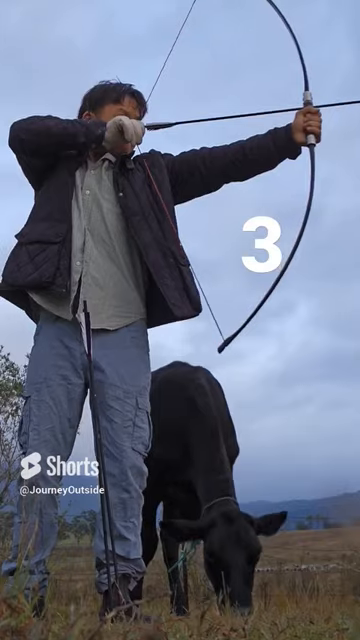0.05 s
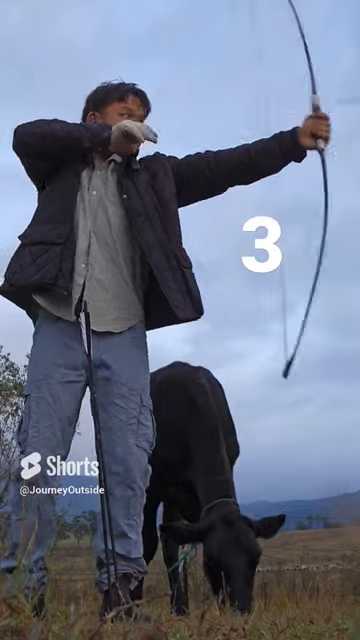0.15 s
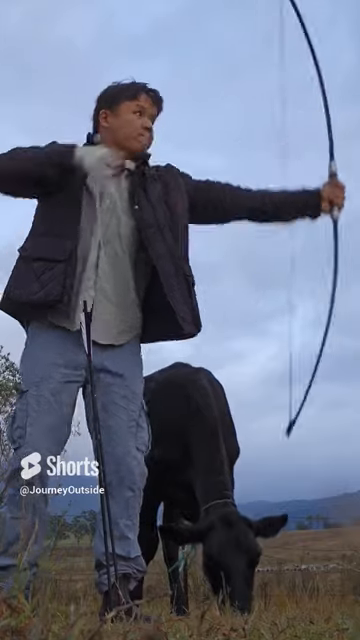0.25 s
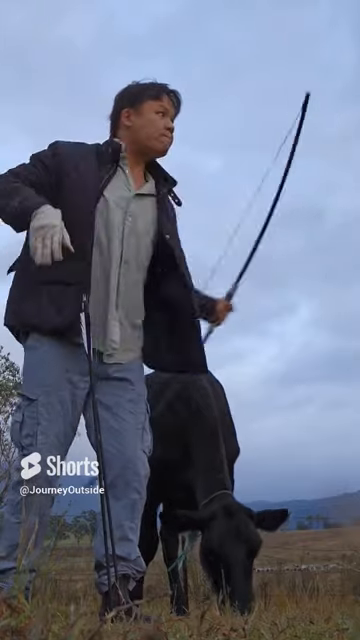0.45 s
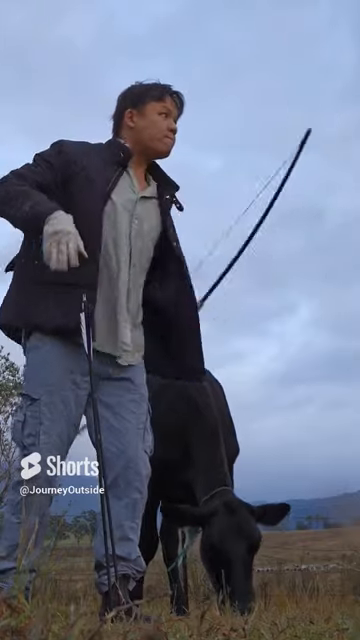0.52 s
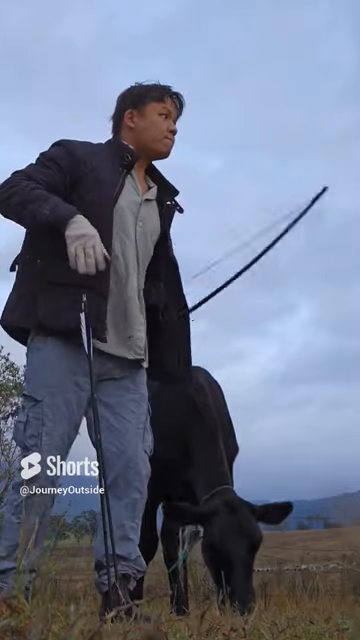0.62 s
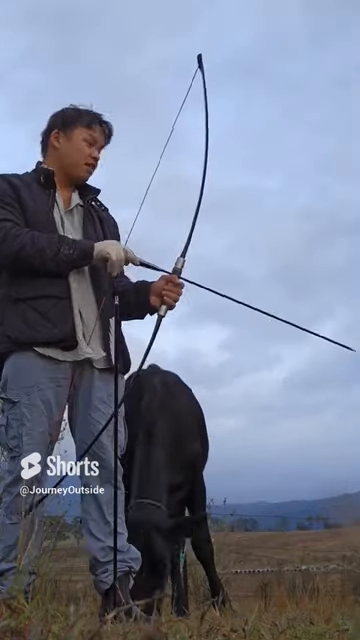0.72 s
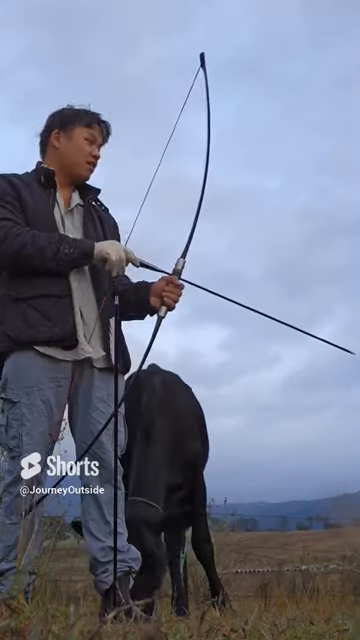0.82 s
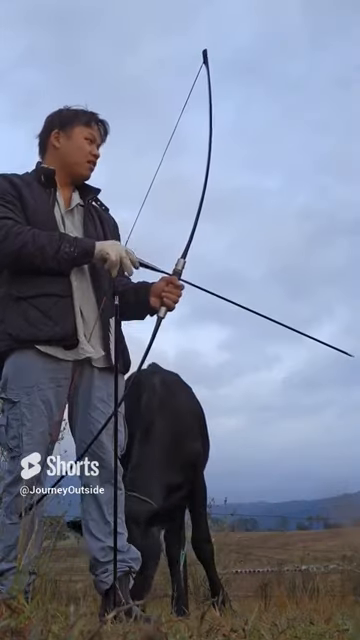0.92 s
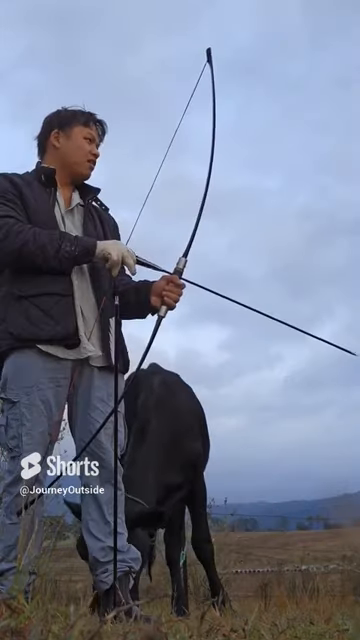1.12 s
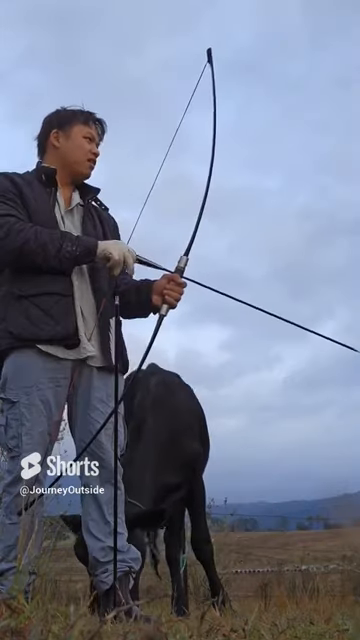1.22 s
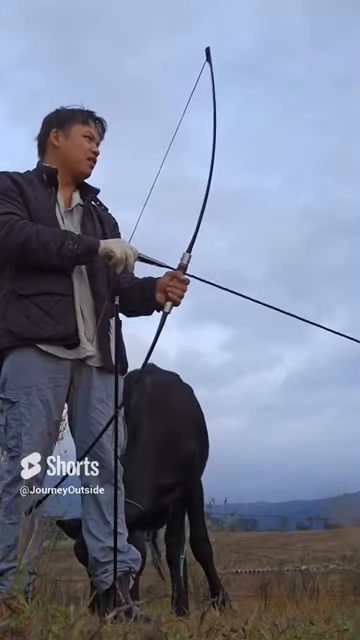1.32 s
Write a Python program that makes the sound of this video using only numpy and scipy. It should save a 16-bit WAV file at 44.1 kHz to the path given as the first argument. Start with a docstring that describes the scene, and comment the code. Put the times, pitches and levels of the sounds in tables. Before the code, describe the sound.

A bowstring snaps sharply close by at about 0.2 seconds. The arrow scrapes and rattles past the bow and swishes off slightly left, while the bow thumps and the string hums low, fading by 0.7 seconds. After a brief near-silence, soft knocks of arrow handling come from 0.8 to 1 second. Faint air and insects fill the open field, with a distant bird whistling twice around 1.2 seconds.

```python
"""A bowstring slips off an archer's glove and snaps home, close by in an open field. The arrow scrapes
past the bow, rings and swishes away, the limbs thump and ring in their damped modes, and the string
hums and buzzes out in free vibration. After a brief near-silence the next arrow is handled with soft
knocks. Low air, insects and a far bird lie behind."""
import sys
import numpy as np
from scipy import signal
from scipy.fft import rfft, irfft, next_fast_len
from scipy.io import wavfile
from scipy.ndimage import map_coordinates

SR = 44100
rng = np.random.default_rng(int(sys.argv[2]) if len(sys.argv) > 2 else 0)


def inscribe(sig):
    """Save sig as 16-bit PCM at rate SR to the path in sys.argv[1].

    A 1-D sig is mono; a 2-D sig holds one channel per row.
    Samples are clipped to [-1, 1] before scaling.
    """
    pcm = np.round(np.clip(np.atleast_2d(sig).T, -1, 1) * 32767)
    wavfile.write(sys.argv[1], SR, pcm.astype(np.int16))


N = 59535

# spectrum of a bright click: f/Hz, relative level/dB
CLICK_SPECTRUM = [(500, -25), (2500, -10), (4400, 2), (7000, -6), (8500, -2), (10500, -8), (13000, -2),
                  (16000, -4)]
# left-right coherence of the open field: f/Hz, correlation
FIELD_COHERENCE = [(60, .75), (130, .7), (300, .55), (650, .35), (1500, .3), (3500, .15), (7000, 0)]
# left-right coherence of sounds at the bow: f/Hz, correlation
BOW_COHERENCE = [(200, .99), (650, .95), (1400, .75), (2000, .3), (2600, -.1), (4500, -.3), (7000, -.1),
                 (14000, 0)]


def amp(db):
    """Amplitude ratio of a level in decibels."""
    return 10 ** (np.asarray(db) / 20)


def unit_rms(x):
    """Normalisation to unit mean power."""
    return x / np.sqrt(np.mean(x ** 2) + 1e-20)


def since(start):
    """Time/s elapsed since start, zero before it."""
    return np.maximum(np.arange(N) / SR - start, 0)


def along(points, hz):
    """Interpolation of (f/Hz, value) points on a logarithmic frequency axis."""
    f, values = np.transpose(points)
    return np.interp(np.log(hz + 1), np.log(f + 1), values)


def filtered(x, response):
    """Linear filtering: the spectrum of x is multiplied by a frequency response."""
    size = next_fast_len(N + 4096, True)
    return irfft(rfft(x, size) * response(np.fft.rfftfreq(size, 1 / SR)), size)[..., :N]


def wobble(rate):
    """Random offset: a smooth curve through Gaussian knots, crossing only rate/SR knots a second, so nearly
    constant."""
    return map_coordinates(rng.standard_normal(N // 8), [since(0) * rate / SR])


def pan(left_db):
    """Level difference between the channels, left over right, as two gains."""
    return amp(np.array([[left_db], [-left_db]]) / 2)


def noise(spectrum, coherence):
    """Coloured stereo noise of unit rms; the ratio of mid to side sets its coherence."""
    def response(hz):
        angle = np.arccos(np.clip(along(coherence, hz), -1, 1)) / 2
        return amp(along(spectrum, hz)) * [np.cos(angle), np.sin(angle)]
    mid, side = filtered(rng.standard_normal((2, N)), response)
    return unit_rms(np.array([mid + side, mid - side]))


def envelope(start, attack, hold, t60, db):
    """Exponential decay, 60 dB in t60, after a smooth rise and a hold (all times in s)."""
    rise = np.sin(np.pi / 2 * np.minimum(since(start) / (attack + 1e-6), 1)) ** 2
    return amp(db) * rise * np.exp(-np.log(1000) * since(start + attack + hold) / t60)


def ring(modes, start, attack, jitter_rad):
    """Superposition of damped modes struck together, each with a small random phase offset."""
    return sum(envelope(start, attack, 0, t60, db)
               * np.sin(2 * np.pi * hz * since(start) + jitter_rad * wobble(90))
               for hz, db, t60 in modes)


def air():
    """Moving air gives broadband noise, strongest at low frequencies and drifting in level."""
    # spectrum of the air: f/Hz, relative level/dB
    spectrum = [(20, -20), (40, -5), (85, 0), (170, -3), (250, -4), (350, -12), (700, -15.5), (1000, -23),
                (1500, -26), (1900, -32), (2700, -35), (4400, -35), (6000, -41), (10000, -45), (11500, -40),
                (15500, -42)]
    # slow drift: t/s, level/dB
    drift = [(0, -67), (.17, -65.5), (.58, -68.5), (.72, -66.5), (.85, -68), (1.35, -69.3)]
    level_db = np.interp(since(0), *np.transpose(drift)) + 1.2 * wobble(25)
    return amp(level_db) * noise(spectrum, FIELD_COHERENCE) * pan(left_db=1.3)


def insects():
    """An insect chorus is narrow-band noise at a nearly steady level."""
    # band of the chorus: f/Hz, relative level/dB
    spectrum = [(2600, -50), (3200, -22), (3450, -6), (3680, 0), (3830, -4), (4020, -21), (4600, -50)]
    level_db = -79 + 1.3 * wobble(60)
    return amp(level_db) * noise(spectrum, FIELD_COHERENCE) * pan(left_db=.4)


def bird():
    """A far bird whistles two nearly pure tones."""
    # whistles: t/s, duration/s, f/Hz, level/dB
    notes = [(1.152, .088, 1211, -78), (1.25, .12, 1604, -87)]
    return sum(envelope(start, attack=.015, hold=length - .02, t60=.08, db=db)
               * np.sin(2 * np.pi * hz * since(start) + .2 * wobble(40))
               for start, length, hz, db in notes)


def wash():
    """Reverberation: an airy wash from the field decays exponentially after the snap."""
    return envelope(.27, attack=.04, hold=0, t60=.75, db=-79) * noise(CLICK_SPECTRUM, FIELD_COHERENCE)


def scatter(x, t60, db):
    """Diffuse scattering by grass and ground: convolution with a short tail of decaying noise."""
    decay = envelope(.004, attack=.004, hold=0, t60=t60, db=0)[:SR // 2]
    tail = rng.standard_normal((2, SR // 2)) * decay
    return amp(db) * signal.fftconvolve(x, tail / np.linalg.norm(tail[0]), axes=1)[:, :N]


def ticks():
    """Light contacts of arrow and clothing are brief, hence broadband, transients."""
    # contacts: t/s, level/dB
    contacts = [(.179, -81), (.972, -86), (.984, -85), (1.003, -86), (1.031, -85), (1.121, -86),
                (1.135, -82)]
    bursts = sum(envelope(start, attack=.0003, hold=.0005, t60=.015, db=db) for start, db in contacts)
    return bursts * noise(CLICK_SPECTRUM, FIELD_COHERENCE)


def handling():
    """Soft impacts of hand, sleeve and arrow excite damped modes of the bow; cloth friction rustles."""
    # knocks: t/s, tap level/dB, thud level/dB, t60/s
    knocks = [(.532, -60, -59, .07), (.548, -62, -63, .04), (.816, -57, -68, .025), (.832, -66, -72, .05),
              (.853, -50, -51, .028), (.863, -58, -55, .035), (.885, -61, -64, .04), (.890, -64, -49, .06),
              (.9105, -52, -57, .03), (.921, -62, -57, .05), (.978, -59, -56, .04)]
    # spectrum of taps and rustle: f/Hz, relative level/dB
    dull_spectrum = [(100, -12), (220, 3), (400, -4), (600, -2), (800, -6), (1200, -5), (1700, -18),
                     (2200, -30), (3000, -42), (8000, -50)]
    # modes of a thud: f/Hz, relative level/dB
    thud_modes = [(110, 0), (230, -1)]
    rustle = envelope(.80, attack=.04, hold=.07, t60=.18, db=-65) * noise(dull_spectrum, BOW_COHERENCE)
    impacts = 0
    for start, tap_db, thud_db, t60 in knocks:
        modes = [(hz, db + thud_db, t60) for hz, db in thud_modes]
        thud = ring(modes, start, attack=.001, jitter_rad=.4)
        tap = envelope(start, .0007, 0, t60, tap_db) * noise(dull_spectrum, BOW_COHERENCE)
        impacts = impacts + thud + tap
    return (rustle + impacts) * pan(left_db=1.2)


def string_hum():
    """Free vibration of the string: a fundamental, its harmonics and a buzz pulsed once a cycle."""
    # overtones: harmonic number, level re fundamental/dB
    overtones = [(2, -11), (3, -17), (10, -20)]
    # spectrum of the buzz: f/Hz, relative level/dB
    buzz_spectrum = [(60, -25), (120, 0), (210, 0), (330, -7), (520, -8), (630, -15), (730, -13), (815, -3),
                     (900, -13), (1100, -18), (1450, -22), (1900, -36), (2600, -44), (3500, -38),
                     (5000, -46), (15000, -52)]
    start, fundamental_hz, pulse_depth = .28, 80.7, .55
    phase = 2 * np.pi * fundamental_hz * since(start) + .12 * wobble(25)
    tone = np.sin(phase) + sum(amp(db + 2.5 * wobble(25)) * np.sin(k * phase) for k, db in overtones)
    pulsed_noise = (1 + pulse_depth * np.cos(phase)) * noise(buzz_spectrum, BOW_COHERENCE)
    hum = envelope(start, attack=.035, hold=.07, t60=.53, db=-49) * tone
    buzz = envelope(start, attack=.03, hold=.07, t60=.5, db=-55) * pulsed_noise
    return (hum + buzz) * pan(left_db=1.4)


def bow_limbs():
    """Elastic recoil: the limbs spring forward with a deep thump and ring in their normal modes."""
    # modes of limbs and riser: f/Hz, level/dB, t60/s
    modes = [(137, -42, .42), (200, -43, .36), (273, -41, .25), (299, -46, .3), (373, -46, .18),
             (402, -47, .2)]
    recoil_start, recoil_hz = .244, 51
    swing = np.sin(2 * np.pi * recoil_hz * since(recoil_start))
    thump = envelope(recoil_start, attack=.032, hold=.006, t60=.14, db=-38) * swing
    return (thump + ring(modes, start=.227, attack=.003, jitter_rad=.3)) * pan(left_db=1.3)


def arrow():
    """Friction and impact: the shaft scrapes, rattles and rings on the bow, then swishes off left."""
    # spectra of the rubbing, the rattle and the flight: f/Hz, relative level/dB
    scrape_spectrum = [(900, -20), (1600, -10), (2400, -1), (2850, -13), (3200, 6), (3500, 3), (4000, 0),
                       (4500, -3), (5500, -8), (6800, -23), (8200, -7), (9300, -20), (10200, -27),
                       (12000, -18), (15500, -21)]
    rattle_spectrum = [(100, -14), (150, 1), (500, -1), (950, 0), (1400, 0), (1900, -4), (2200, -16),
                       (2400, -9), (2850, -25), (3200, -15), (4500, -22), (6800, -36), (8200, -31),
                       (10500, -43), (15000, -37)]
    swish_spectrum = [(1500, -20), (2750, -14), (3200, 0), (3650, -4), (4200, -11), (5000, -16),
                      (7000, -26), (8500, -25), (10500, -33), (12000, -28), (15000, -29)]
    # modes of the shaft: f/Hz, level/dB, t60/s
    modes = [(545, -49, .2), (646, -52, .2), (748, -47, .19), (851, -47, .28), (885, -46, .16),
             (997, -51, .16), (1109, -49, .21), (1219, -49, .17), (1410, -53, .08), (1545, -53, .07),
             (1645, -54, .06), (1870, -51, .075), (2381, -52, .09), (3140, -59, .08)]
    # blows to the shaft: t/s, relative level/dB
    hits = [(.236, -1), (.267, 0), (.286, -7)]

    def rough(spectrum, depth_db):
        """Noise of unit rms under a nearly steady random gain."""
        return unit_rms(amp(depth_db * wobble(450))) * noise(spectrum, BOW_COHERENCE)

    scrape = envelope(.2435, attack=.008, hold=.005, t60=.034, db=-38.5) * rough(scrape_spectrum, 2.5)
    rattle = envelope(.222, attack=.015, hold=.037, t60=.11, db=-41) * rough(rattle_spectrum, 3)
    swish = envelope(.268, attack=.02, hold=.007, t60=.11, db=-55) * rough(swish_spectrum, 2.2)
    shaft = sum(amp(db) * ring(modes, start, attack=.002, jitter_rad=.33) for start, db in hits)
    return scrape + rattle + swish * pan(left_db=3) + shaft


def string_snap():
    """Impulsive excitation: the string slips off the glove, then each contact cracks and clicks."""
    # contacts of string and arrow: t/s, crack level/dB, click level/dB, t60/s, click left over right/dB
    contacts = [(.2268, -35, -64, .02, 2), (.2292, -44, -49, .007, 9), (.2312, -32, -51, .009, 0),
                (.2452, -46, -40, .016, -4), (.2585, -58, -53, .025, 3)]
    # spectrum of a woody crack: f/Hz, relative level/dB
    crack_spectrum = [(100, -28), (170, -7), (260, 6), (600, -3), (1100, 1), (1600, -1), (2300, -17),
                      (2900, -24), (3700, -9), (5000, -20), (7000, -33), (10000, -42), (16000, -46)]
    friction = noise(crack_spectrum, BOW_COHERENCE) + amp(-14) * noise(CLICK_SPECTRUM, BOW_COHERENCE)
    slip = envelope(.205, attack=.024, hold=.002, t60=.03, db=-55) * friction
    impacts = 0
    for start, crack_db, click_db, t60, left_db in contacts:
        burst = envelope(start, attack=.0005, hold=.001, t60=t60, db=0)
        crack = amp(crack_db) * noise(crack_spectrum, BOW_COHERENCE)
        click = amp(click_db) * noise(CLICK_SPECTRUM, BOW_COHERENCE) * pan(left_db)
        impacts = impacts + burst * (crack + click)
    return slip + impacts


def scene():
    """Superposition of field and archer; the shot reaches each channel with a different colour."""
    # level difference of the shot: f/Hz, left over right/dB
    balance = [(60, 2), (200, 1.1), (1200, 1), (1800, 1.5), (2750, 7), (4200, 0), (6400, -2.5), (9800, .5),
               (15000, 4)]
    shot = filtered(string_snap() + arrow(), lambda hz: amp(np.outer([.5, -.5], along(balance, hz))))
    archer = shot + bow_limbs() + string_hum() + handling() + ticks()
    field = air() + insects() + bird() + wash() + scatter(shot, t60=.28, db=-25)
    return field + archer


def record(dry):
    """Attenuation and band limiting: the level dips briefly to near silence; the top treble is cut."""
    # the dip: t/s, gain/dB
    dip = [(.768, 0), (.776, -16), (.785, -50), (.801, -60), (.806, -8), (.811, 0)]
    cutoff_hz = 15850
    gain = amp(np.interp(since(0), *np.transpose(dip)))
    return filtered(dry * gain, lambda hz: hz < cutoff_hz)


dry = scene()
out = record(dry)
inscribe(out)
```